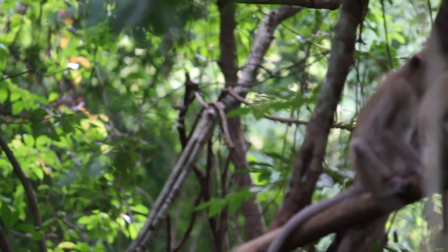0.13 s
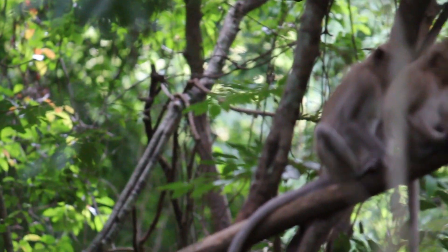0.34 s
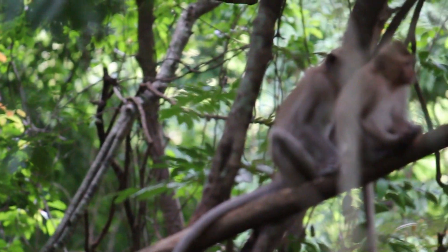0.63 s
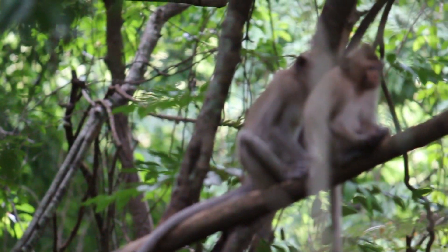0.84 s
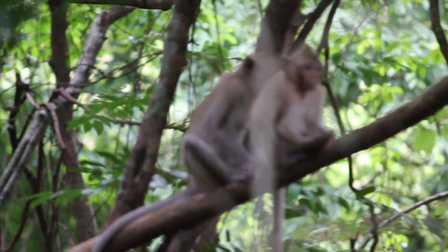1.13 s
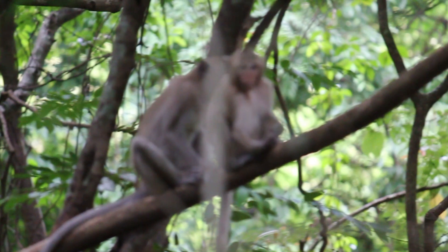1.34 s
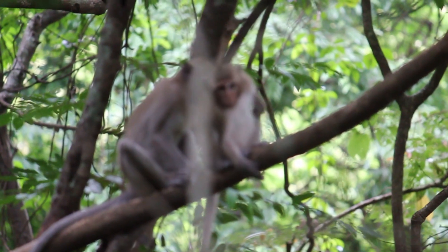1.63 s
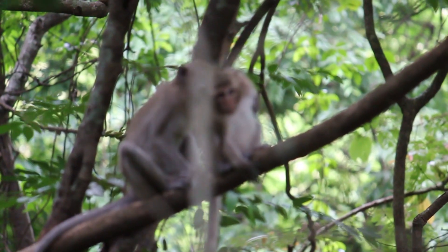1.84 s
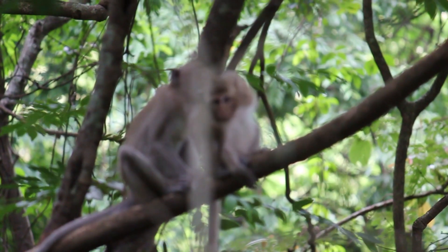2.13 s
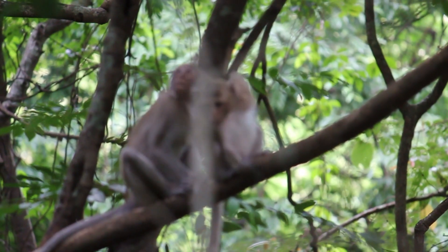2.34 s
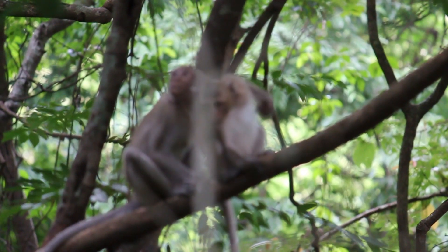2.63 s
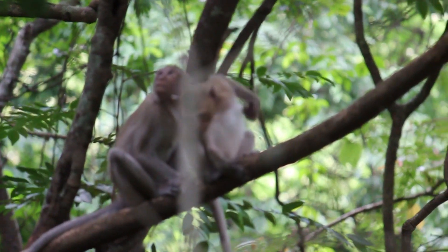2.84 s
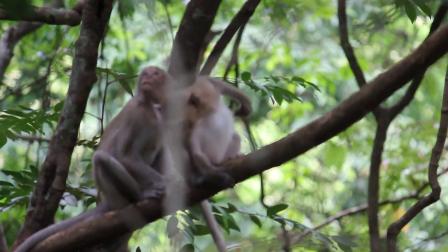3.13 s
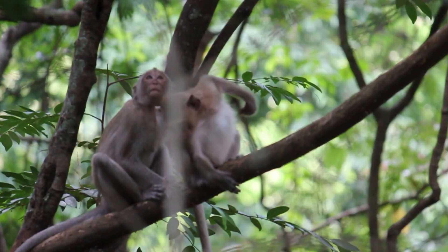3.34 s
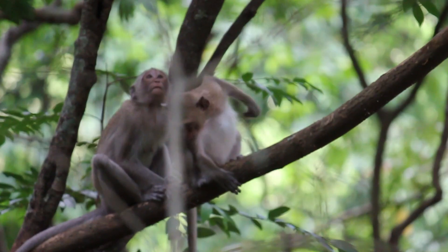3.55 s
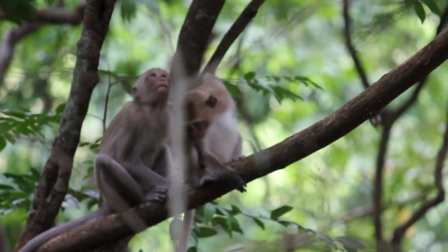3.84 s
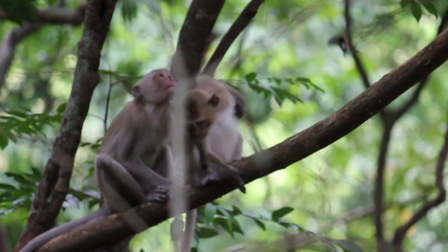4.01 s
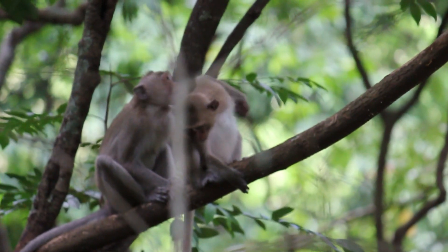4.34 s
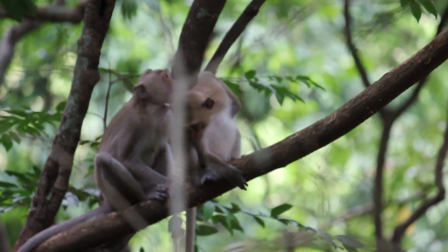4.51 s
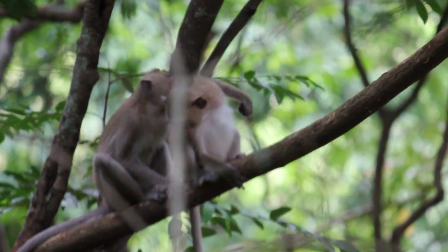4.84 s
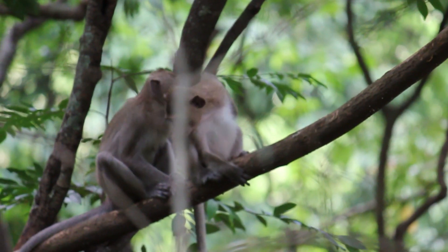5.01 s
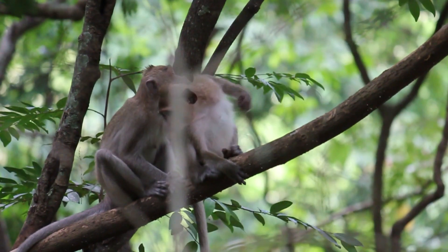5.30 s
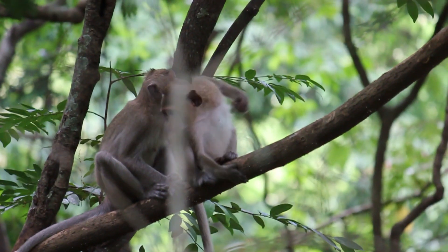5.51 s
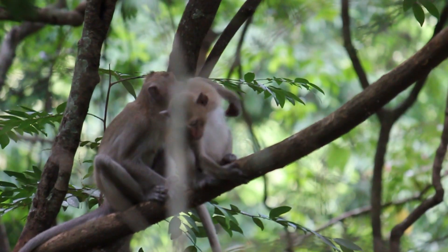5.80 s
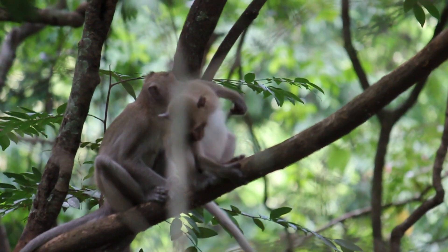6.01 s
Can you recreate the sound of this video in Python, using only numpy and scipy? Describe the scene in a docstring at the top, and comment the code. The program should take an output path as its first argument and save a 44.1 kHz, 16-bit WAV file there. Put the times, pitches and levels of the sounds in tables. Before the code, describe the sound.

Small birds chirp, whistle and twitter through an echoing forest, over a steady soft leafy hush and a faint low mechanical throb.

```python
"""A forest full of small birds, over a steady hush and a very low throb in the camera body, both there throughout.
First a bird on the right sings quick high peeps, slides and plunges, then a near one sings loud climbs and hooks.
From 3 s come a long falling whistle, pips and arches, then the high slides again; near 6 s, ticks and harsh notes.
Notes are gliding sines, far twitter is many short rough ones, and trunks and leaves echo both as sparse taps.
The hush is shaped noise; the throb is a mechanism that sways, jolts and knocks as it turns."""
import sys
import numpy as np
from scipy import signal
from scipy.io import wavfile
from scipy.ndimage import uniform_filter1d

SR = 44100
rng = np.random.default_rng(int(sys.argv[2]) if len(sys.argv) > 2 else 0)


def transcribe(signal):
    """Save signal, clipped to [-1, 1], as a 16-bit WAV file at the path in sys.argv[1]."""
    frames = np.atleast_2d(signal).T
    limited = np.clip(frames, -1, 1)
    pcm = np.round(limited * 32767).astype(np.int16)
    wavfile.write(sys.argv[1], SR, pcm)


N = 271656


def gain_of(db):
    """Decibels to an amplitude factor."""
    return 10 ** (np.asarray(db) / 20)


def evened(x):
    """Scales a signal to rms 1."""
    return x / np.sqrt(np.mean(x ** 2) + 1e-20)


def read(points, hz):
    """Reads a table of (frequency, value) on a log-frequency axis."""
    f, value = np.transpose(points)
    return np.interp(np.log(hz + 1), np.log(f + 1), value)


def add(mix, start_s, sound):
    """Mixes a sound in at start_s, cut off at the end of the mix."""
    part = mix[:, round(start_s * SR):][:, :sound.shape[1]]
    part += sound[:, :part.shape[1]]


def placed(sound, balance_db):
    """Pans by level: a positive balance makes the left channel louder."""
    return sound * gain_of([[balance_db / 2], [-balance_db / 2]])


def hush(level_db=-53.5, patchy_db=1.):
    """Leaves, air and microphone: steady shaped noise with faint drifting patches, more alike in the bass."""
    # colour of the hush, relative: (frequency [Hz], density [dB per Hz])
    hush_colour = [(20, 4), (60, -7.5), (100, -5.5), (300, 1), (450, -2.5), (700, -5.5), (2000, -7),
                   (4000, -11), (7000, -8), (9000, -12.5), (15500, -14)]
    # how alike left and right are: (frequency [Hz], likeness [0-1])
    hush_likeness = [(25, 0.81), (125, 0.88), (500, 0.36), (2000, 0.29), (8000, 0.12)]
    frames, hz = N // 256 + 5, np.fft.rfftfreq(1024, 1 / SR)
    a, b, c, d, patches = rng.standard_normal((frames, 513, 5)).T
    patches = uniform_filter1d(patches, size=20, axis=0)  # across frequency
    patches = evened(uniform_filter1d(patches, size=8, axis=1))  # across time
    same = read(hush_likeness, hz)[:, None]
    left = a + 1j * b
    right = same * left + np.sqrt(1 - same ** 2) * (c + 1j * d)
    spectrum = np.array([left, right])
    spectrum *= gain_of(read(hush_colour, hz)[:, None] + patchy_db * patches)
    noise = signal.istft(spectrum, nperseg=1024, noverlap=768)[1][:, :N]
    return gain_of(level_db) * evened(noise)


def throb(sway_db=-56, jolt_db=-55, knock_db=-54):
    """A mechanism in the camera sways twice a turn; once a turn it jolts and knocks, a little unevenly."""
    turns_per_s, wobble_hz, wobble_s = 5.845, 1.25, .0018
    t = np.arange(N) / SR
    uneven_t = t + wobble_s * np.cos(2 * np.pi * wobble_hz * (t - 1.3))
    turn = uneven_t * turns_per_s % 1  # 0-1 within each turn
    sway = gain_of(sway_db) * np.cos(4 * np.pi * (turn - .43))
    jolt = -gain_of(jolt_db) * np.exp(-((turn - .12) / .059) ** 2)
    u = (turn - .22) / .042
    knock = gain_of(knock_db) * (2 * u ** 2 - 1) * np.exp(-u ** 2)  # a sharp dip with a rebound on either side
    return sway + jolt + knock


def notes(swell_db=1.5):
    """The score: yields every note as bird, echo level in dB, and rows of time, pitch and level."""
    # In bird names left and right are mirrored: a "left" bird is heard on the right, a "right" one on the left.
    # syllables sung again and again: name: (bird, echo level [dB], [(time [s], pitch [Hz], level [dB]), ..]);
    # time and pitch are stretched to fit, and level is relative, each time one is sung
    syllables = { "peep": ("left", -1.5, [(0, 7900, 0), (.012, 7930, 0)]),
                 "slide": ("left", 2.5, [(0, 5770, -1.5), (.006, 5620, -3), (.025, 5130, -3),
                 (.058, 4400, 1.5), (.075, 4100, -13)]), "step": ("left", 4, [(0, 8200, -8),
                 (.006, 7500, -8), (.015, 7110, -4), (.052, 7010, 0), (.057, 6800, 0), (.062, 6350, 1.2),
                 (.069, 5650, 1.2)]), "plunge": ("left", 5, [(0, 5650, 0), (.013, 4550, -5),
                 (.025, 4010, -8), (.044, 3680, -8)]), "climb": ("near", -6, [(0, 3450, -14),
                 (.007, 3640, -30), (.013, 3690, -14), (.042, 4700, 0), (.053, 5120, -7),
                 (.056, 5600, -2.5), (.059, 6800, -14), (.062, 7700, -26)]),
                 "drop": ("near", -8, [(0, 5600, -12), (.004, 4850, -4), (.011, 4400, 0),
                 (.038, 4050, -1.5)]), "hook": ("near", -11, [(0, 4200, -12), (.0015, 4800, -4),
                 (.006, 6750, -6), (.008, 7060, -15), (.021, 6070, -2.5), (.041, 6200, 0),
                 (.068, 5120, -2.5), (.079, 4850, .6)]), "upstroke": ("high", -2.5, [(0, 6750, 2.5),
                 (.012, 7930, -2.5)]), "undertone": ("high", -1.5, [(0, 6130, 0), (.011, 6340, 0)]),
                 "snap": ("high", -3, [(0, 8000, -3), (.005, 5400, 0)]),
                 "pip": ("right", -3.5, [(0, 3600, -9), (.004, 3740, 0), (.007, 3860, -6)]),
                 "low pip": ("right", -5, [(0, 3060, -8), (.01, 3190, 0), (.023, 3320, -10)]),
                 "arch": ("quick", -2.5, [(0, 4600, 1.5), (.006, 5550, -.6), (.01, 5850, -5),
                 (.016, 5800, -3), (.019, 5200, -3), (.023, 3750, 2.5)]),
                 "flick": ("quick", -8, [(0, 5900, -16), (.004, 4950, 0), (.005, 4740, -5),
                 (.019, 4310, -5)]), "rise": ("right", -7.5, [(0, 3190, -11), (.01, 3260, -11),
                 (.025, 3490, -15), (.03, 3600, -3), (.044, 3775, 0), (.064, 3810, -4), (.077, 3810, -12)]),
                 "tick": ("quick", -2.5, [(0, 4690, 0), (.005, 4490, -.6), (.014, 3980, -.6)]),
                 "hump": ("high", -3, [(0, 6150, -4), (.02, 6550, 0), (.04, 6100, -3)])}
    # each time a syllable is sung: name: (start [s], length [s], first pitch [Hz], level [dB])
    sung = { "peep": [(.147, .011, 7650, -56), (.599, .014, 7930, -53), (1.075, .01, 8130, -53),
            (2.58, .017, 7940, -60), (4.405, .014, 7710, -53), (4.85, .008, 7890, -60)],
            "slide": [(.166, .073, 5700, -45), (.625, .075, 5790, -43), (1.1, .071, 5830, -47),
            (3.623, .05, 5750, -45), (3.972, .072, 5750, -47), (4.158, .074, 5770, -50),
            (4.433, .078, 5780, -48), (4.631, .074, 5760, -45), (4.875, .079, 5780, -49),
            (5.333, .07, 5790, -61)], "step": [(.305, .068, 8200, -49), (.772, .073, 8220, -46),
            (3.666, .068, 8170, -47), (4.111, .069, 8180, -51), (4.298, .07, 8230, -50),
            (4.572, .069, 8080, -52), (5.018, .068, 8280, -51)], "plunge": [(.371, .046, 5650, -44),
            (.843, .042, 5660, -45), (4.366, .044, 5650, -56), (4.639, .043, 5640, -52),
            (5.084, .044, 5750, -53)], "climb": [(1.249, .062, 3430, -25.5), (1.417, .062, 3480, -25)],
            "drop": [(1.304, .039, 5650, -31), (1.476, .037, 5550, -32.5)],
            "hook": [(2.028, .079, 4210, -30), (2.159, .079, 4190, -30.5)],
            "upstroke": [(2.599, .011, 6740, -51), (2.873, .014, 6760, -50)],
            "undertone": [(2.603, .012, 6110, -57), (2.88, .01, 6150, -53)],
            "snap": [(.156, .005, 8300, -56), (.625, .006, 7800, -50), (2.625, .004, 7600, -47),
            (2.901, .003, 7400, -52)], "pip": [(3.23, .007, 3660, -39), (3.278, .007, 3620, -37),
            (3.339, .007, 3590, -38), (3.405, .007, 3580, -39)], "low pip": [(3.232, .02, 3040, -45),
            (3.28, .026, 3060, -42.5), (3.344, .02, 3090, -39), (3.409, .027, 3070, -40)],
            "arch": [(3.243, .022, 4500, -42), (3.303, .022, 4610, -41), (3.365, .022, 4620, -39),
            (3.432, .023, 4640, -46)], "flick": [(3.594, .019, 5850, -34), (3.762, .019, 5910, -31)],
            "rise": [(3.604, .077, 3200, -27.5), (3.773, .073, 3195, -28.5)],
            "tick": [(5.949, .014, 4710, -45), (6.017, .014, 4700, -48), (6.076, .014, 4660, -44),
            (6.14, .014, 4670, -45)], "hump": [(5.191, .04, 6150, -58), (5.345, .035, 6100, -59),
            (5.345, .04, 6800, -63), (5.76, .04, 6200, -59), (5.755, .045, 7000, -63)]}
    # plain straight glides, before the swell: bird: (start [s], length [s], first pitch [Hz],
    # last pitch [Hz], first level [dB], last level [dB], echo level [dB])
    glides = { "far left": [(0, 0.069, 6930, 6860, -52.5, -70, -14),
              (.465, 0.062, 4450, 4570, -42.5, -44, 0), (.93, .03, 3950, 4540, -56, -44, -3),
              (.958, 0.045, 4470, 4540, -49, -49, -9), (4.278, 0.0354, 4150, 4460, -47.5, -50, 3),
              (4.997, 0.041, 6630, 6030, -70, -62, -4), (5.195, 0.051, 4480, 4510, -53, -62, -11)],
              "far": [(.397, 0.058, 4740, 4480, -54, -42, -2), (.458, 0.026, 5376, 5220, -36, -51, 5.5),
              (.52, .04, 5310, 5340, -39.5, -61, 5), (.596, 0.043, 4460, 4460, -42.5, -55, 3),
              (.64, 0.056, 6690, 6320, -46.5, -62, 5.5), (.652, 0.057, 5210, 5280, -45.5, -51, 0.5),
              (.731, 0.033, 5120, 5040, -40.5, -50, 4), (.789, 0.013, 5460, 5490, -29, -50, 7),
              (1.12, 0.085, 7000, 6250, -55, -47, 0.5), (1.248, 0.043, 5220, 4730, -37.5, -59, 3),
              (1.38, 0.04, 7000, 6510, -63, -55, 9), (3.029, 0.037, 5280, 5730, -51, -59, 5),
              (3.4, 0.082, 8000, 7850, -62, -57, 3), (5.6, 0.11, 4204, 4240, -55.5, -57.5, 0)],
              "high": [(.085, 0.046, 5470, 5470, -57, -46, -3), (1.969, .006, 8540, 8000, -45, -41, -2),
              (2.42, 0.15, 6420, 7180, -58.5, -64, 2), (3.735, 0.042, 7960, 7610, -53, -61, -3),
              (5.4, 0.127, 6950, 6840, -59.5, -62, 1), (5.6, .04, 5510, 5420, -53, -62, -3),
              (5.705, 0.033, 5360, 5720, -55, -55, 6), (5.856, 0.0354, 5360, 5740, -56, -56, 3),
              (6.11, .048, 5600, 5500, -68, -61, -4), (5.838, 0.095, 4620, 4340, -56.5, -67, 6)],
              "near": [(.99, 0.012, 5140, 4510, -31, -36, 2.5), (1.142, 0.037, 3800, 3790, -46, -59, -13),
              (1.656, .014, 4726, 5410, -58, -24, -4), (1.67, 0.015, 5300, 5300, -22.5, -53, -24),
              (1.677, .006, 5000, 4130, -34, -49, -16), (1.748, 0.0072, 4220, 5660, -42, -29, -31),
              (2.063, 0.042, 5230, 5300, -44, -44, 4), (2.735, 0.044, 3800, 3930, -38, -55, -19)],
              "right": [(.605, .015, 4270, 3660, -54, -46, -12), (1.44, 0.053, 3200, 3200, -44.5, -67, -4),
              (1.53, .06, 3200, 3140, -56, -51.5, -15), (1.96, 0.052, 3560, 3130, -49, -48, -3),
              (2.363, 0.028, 4140, 3690, -40, -41, -10), (2.59, 0.061, 3090, 3160, -56, -64, -9),
              (2.94, 0.084, 3930, 3160, -41, -42, -9), (4.97, 0.079, 4000, 4340, -59, -59, 6.5),
              (5.23, 0.23, 4120, 4080, -53, -69.5, 5), (5.7, 0.054, 3520, 3170, -51, -60, 0),
              (5.965, 0.05, 3320, 3130, -52, -60, 0.5), (5.992, 0.033, 4350, 3900, -67, -41, -1.5)],
              "behind": [(2.554, 0.048, 4660, 4300, -32, -49, -6),
              (3.709, 0.041, 3700, 3990, -39, -39, -2.5)],
              "quick": [(2.915, 0.0225, 4400, 4250, -40, -32, -4),
              (3.178, 0.0222, 4870, 3990, -51, -41, 8)], "low": [(.64, 0.099, 2680, 2615, -72, -62, 4),
              (.954, .08, 2960, 2770, -60, -69, 0), (1.03, .08, 2706, 2480, -65, -64, 1),
              (1.15, 0.097, 2970, 3105, -70, -59.5, 5), (1.591, 0.027, 3120, 2435, -68, -54, 2.5),
              (2.27, 0.062, 2324, 2400, -59.5, -66, 4.5), (4.15, 0.089, 2175, 1924, -61, -76, 5.5),
              (4.38, 0.072, 2680, 2300, -59, -65, 3), (4.46, .06, 2984, 2940, -54, -60, 0),
              (4.53, .095, 2703, 2440, -58.5, -58, 3), (4.95, 0.041, 3450, 2880, -59, -62, 6.5)],
              "low left": [(4.869, 0.037, 3110, 2986, -53, -51.5, -0.5),
              (4.91, 0.048, 2450, 2430, -49.5, -53, -8), (5.003, 0.023, 2400, 2314, -53, -59, -4),
              (5.045, 0.027, 2435, 2350, -59, -56, -1), (6.1, 0.052, 2950, 2390, -55, -45.5, -15)],
              "hoarse": [(2.096, 0.036, 4150, 3806, -37.5, -34, -9),
              (2.64, 0.031, 4450, 3927, -32, -35, -2), (2.68, .075, 3920, 3150, -34, -46.5, -4),
              (4.1, 0.03, 3910, 3620, -40, -46.5, -11)], "harsh": [(3.568, 0.018, 9200, 7160, -41, -43, -4),
              (3.577, 0.013, 6600, 8950, -32, -58, 3), (6.042, 0.026, 2930, 2360, -58, -58, -2),
              (6.058, .017, 3250, 1930, -59, -54, 0), (6.076, 0.016, 3230, 2530, -52, -52, 7.5),
              (6.093, 0.016, 3230, 2670, -52, -53, -12), (6.1, 0.013, 2500, 2090, -48, -58, -1),
              (6.115, 0.022, 2750, 3000, -49, -48, -6), (6.148, 0.016, 2480, 2940, -46, -46, 2.5)]}
    # winding notes sung once: (bird, echo level [dB], [(time [s], pitch [Hz], level [dB]), ..])
    phrases = [ ("far left", 5.1, [(0, 3390, -43), (.014, 4000, -52.5), (.032, 4454, -47),
               (.16, 4440, -70)]), ("near", -9.5, [(1.006, 3500, -34), (1.013, 5180, -30),
               (1.018, 4770, -31), (1.027, 4220, -30), (1.04, 3940, -33.5), (1.062, 3774, -36.5),
               (1.101, 3740, -30), (1.111, 3530, -45)]), ("near", -8, [(1.576, 7670, -43),
               (1.601, 6840, -30), (1.607, 6750, -36), (1.626, 6950, -33), (1.665, 5870, -31)]),
               ("near", -5.5, [(1.755, 3670, -49), (1.766, 4440, -30), (1.783, 4760, -30),
               (1.799, 3960, -33.5), (1.812, 3500, -35.5), (1.83, 3294, -45.5), (1.868, 3790, -32.5),
               (1.903, 4184, -36.5)]), ("right", -7.5, [(2.138, 3880, -37), (2.223, 3767, -35),
               (2.257, 3770, -38)]), ("quick", -3.5, [(2.285, 4480, -37), (2.298, 3710, -47),
               (2.346, 4100, -36.5)]), ("burred", -7, [(2.292, 3790, -34.5), (2.334, 3340, -50),
               (2.343, 2910, -46), (2.391, 2306, -53)]), ("behind", -9.5, [(2.583, 3695, -32.5),
               (2.6, 3743, -31), (2.632, 3827, -27.5), (2.64, 3860, -35), (2.655, 3885, -31),
               (2.679, 3580, -27)]), ("behind", -5, [(2.883, 5430, -60), (2.905, 5450, -41.5),
               (2.934, 4930, -33.5), (2.955, 4300, -25), (2.968, 4010, -35.5), (2.98, 3780, -27),
               (3.007, 3540, -34.5)]), ("left", 0.23, [(3.1, 7300, -51), (3.12, 7950, -46),
               (3.15, 7820, -44), (3.19, 7410, -34), (3.208, 7210, -42), (3.229, 6870, -34),
               (3.241, 6680, -48), (3.253, 6500, -35), (3.278, 6020, -43.5), (3.296, 5890, -40),
               (3.339, 5200, -40.5)]), ("burred", -0.52, [(3.468, 4220, -43), (3.482, 4326, -37),
               (3.51, 4846, -32), (3.535, 4750, -52), (3.6, 4660, -35.5)]),
               ("near", -.6, [(3.902, 7660, -46), (3.914, 6490, -43), (3.938, 6310, -49),
               (4.032, 6030, -48.5), (4.068, 6130, -61)]), ("right", -3.5, [(5.132, 3840, -44),
               (5.153, 3976, -39), (5.178, 4160, -54), (5.203, 3930, -39.5), (5.221, 3620, -46)]),
               ("right", -.6, [(5.465, 5510, -70), (5.49, 5130, -52), (5.502, 4580, -39.5),
               (5.537, 3700, -42), (5.569, 3540, -56)])]
    for name, times in sung.items():
        bird, echo_db, shape = syllables[name]
        for start, length, first_hz, level_db in times:
            stretch = [length / shape[-1][0], first_hz / shape[0][1], 1]
            yield bird, echo_db, np.array(shape) * stretch + [start, 0, level_db]
    for bird, rows in glides.items():
        for start, length, first_hz, last_hz, first_db, last_db, echo_db in rows:
            first, last = (start, first_hz, first_db), (start + length, last_hz, last_db)
            glide = np.linspace(first, last, 3)
            glide[1, 2] += swell_db  # a plain note swells in its middle
            yield bird, echo_db, glide
    yield from phrases


def whistle(rows, lead_us, rough, longest_edge_s=.004):
    """A gliding sine at two microphones; a rough voice scatters its level and phase."""
    s, hz, level_db = np.transpose(rows)
    t = np.arange(s[0], max(s[-1], s[0] + .0026), 1 / SR)
    hz = uniform_filter1d(np.interp(t, s, hz), size=120, mode="nearest")
    a, b = uniform_filter1d(uniform_filter1d(rng.standard_normal((2, SR // 2)), size=70), size=40)
    scatter = (a + 1j * b) / np.sqrt(np.mean(a ** 2 + b ** 2))
    voice = np.sqrt(1 - rough ** 2) + rough * scatter[:len(t)]
    edge_s = min(longest_edge_s, len(t) / SR / 4)
    to_edge_s = np.minimum(t - t[0], t[-1] - t)
    fade = np.sin(np.pi / 2 * np.clip(to_edge_s / edge_s, 0, 1))
    lead_turns = np.outer([.5, -.5], hz) * lead_us / 10 ** 6  # a positive lead puts the left ahead
    turns = np.cumsum(hz) / SR + rng.random() + lead_turns
    level = np.sqrt(2) * gain_of(np.interp(t, s, level_db))  # levels in the rows are rms
    return level * fade * (voice * np.exp(2j * np.pi * turns)).real


def birds():
    """Direct sound of every note, and the more central share that goes out among the trees."""
    # where each bird is heard and how it sounds: name: (left-right balance [dB], positive = left louder,
    # lead of the left channel [microseconds], roughness [0-1]); the balance gives the side heard:
    # left and right in the names are mirrored, so "left", "far left" and "low left" lie on the right
    perches = {"left": (-14, -25, 0.25), "near": (3, 3, 0.28), "right": (9.3, -58, 0.22),
               "behind": (-3, -50, .13), "high": (2.2, -1, 0.18), "far": (2.5, -4, 0.87),
               "far left": (-13, 17, 0.39), "low": (16, -40, 0.47), "low left": (-4, 6.6, 0.25),
               "quick": (8.5, -20, 0.26), "hoarse": (6.7, -51, 0.94), "harsh": (-3, 36.4, 0.53),
               "burred": (.6, -42, 0.78)}
    direct, sent = np.zeros((2, N)), np.zeros((2, N))
    for bird, echo_db, rows in notes():
        balance_db, lead_us, rough = perches[bird]
        note = whistle(rows, lead_us, rough)
        start_s = max(rows[0][0], 0)
        add(direct, start_s, placed(note, balance_db))
        add(sent, start_s, gain_of(echo_db) * placed(note, .15 * balance_db))
    return direct, sent


def twitter(count=500):
    """Far birds: many short, rough chirps that sweep widely, mostly downward."""
    # base level of a far chirp by pitch: (pitch [Hz], level [dB])
    chirp_levels = [(2000, -79), (3000, -63.5), (4000, -59.5), (5500, -61), (7000, -67), (8200, -40)]
    # how lively the far birds are, added to the base level: (time [s], level [dB])
    bustle = [(0, 9.5), (.5, -12), (1, 14.5), (1.5, 4.5), (2, 6), (2.5, 4), (3, 1.5), (3.5, -2), (4, 5),
              (4.5, 4), (5, -1.5), (5.5, -6), (6.2, -11)]
    out = np.zeros((2, N))
    for when, height, glide, length, side, size in rng.random((count, 6)):
        hz, start_s = 2100 * 3.5 ** height, when * N / SR
        lively_db = np.interp(start_s, *np.transpose(bustle))
        level_db = read(chirp_levels, hz) + lively_db + 5 * (size - .5)
        end_s = start_s + .012 + .04 * length
        first_hz, last_hz = hz * (.95 + .2 * glide), hz * (1.05 - .2 * glide)
        rows = [(start_s, first_hz, level_db), (end_s, last_hz, level_db)]
        chirp = whistle(rows, lead_us=-1., rough=.52)
        add(out, start_s, placed(chirp, 10 * (side - .5)))
    return out


def echoes(build_s=.016, same=.64):
    """Sparse echoes of random sign, the treble dying first; both channels share part of them."""
    # how long the forest rings: (frequency [Hz], time to fall by 60 dB [s])
    forest_t60 = [(2000, 0.99), (4000, 1.09), (6000, 0.86), (9000, 0.65)]
    taps = np.zeros((2, SR))
    # one tap at a random place in every 20 samples
    at = np.arange(0, SR - 20, 20) + rng.integers(0, 20, (2, (SR - 1) // 20))
    np.put_along_axis(taps, at, rng.choice([-1., 1.], at.shape), 1)
    taps[1] = same * taps[0] + np.sqrt(1 - same ** 2) * taps[1]
    hz, t, spectrum = signal.stft(taps, SR, nperseg=256)
    near = gain_of(12 - 60 * t / .094)  # the closest trunks and leaves answer first and strongest
    deep = gain_of(-60 * t / read(forest_t60, hz)[:, None])
    tail = signal.istft(spectrum * (near + deep), SR, nperseg=256)[1]
    tail *= 1 - np.exp(-np.arange(tail.shape[1]) / SR / build_s)  # echoes take a moment to gather
    return tail / np.linalg.norm(tail[0])


def trees(x, shifts_per_s=3.):
    """Birds sit in different places and leaves move: the sound passes three echo patterns in turn."""
    turn = np.pi * shifts_per_s * np.arange(N) / SR
    out = np.zeros((2, N))
    for k in range(3):
        share = np.sqrt(2 / 3) * np.cos(turn + k * np.pi / 3)  # the three powers always sum to 1
        out += signal.fftconvolve(x * share, echoes(), axes=1)[:, :N]
    return out


def scene():
    """Mixes birds, far twitter, the echoes of both, hush and throb."""
    direct, sent = birds()
    far = twitter()
    return direct + .5 * far + trees(sent + far) + hush() + throb()


def record(dry, edge_hz=15600):
    """The band limit of the recorder: a steep lowpass without delay."""
    lowpass = signal.firwin(511, edge_hz, window=("kaiser", 9), fs=SR)
    return signal.oaconvolve(dry, lowpass[None], "same")


dry = scene()
out = record(dry)
transcribe(out)
```